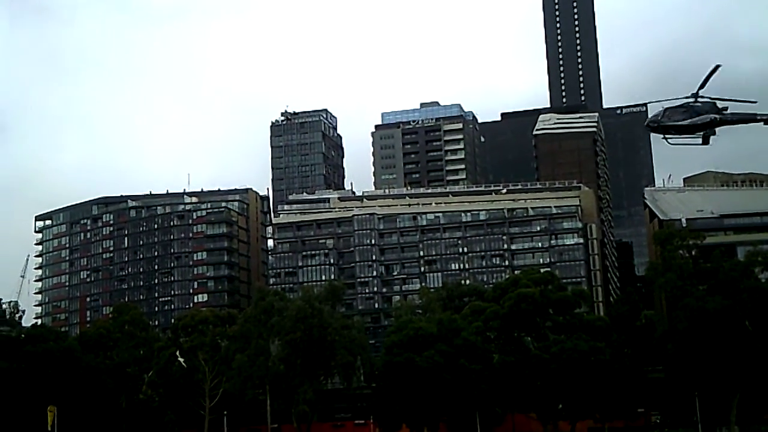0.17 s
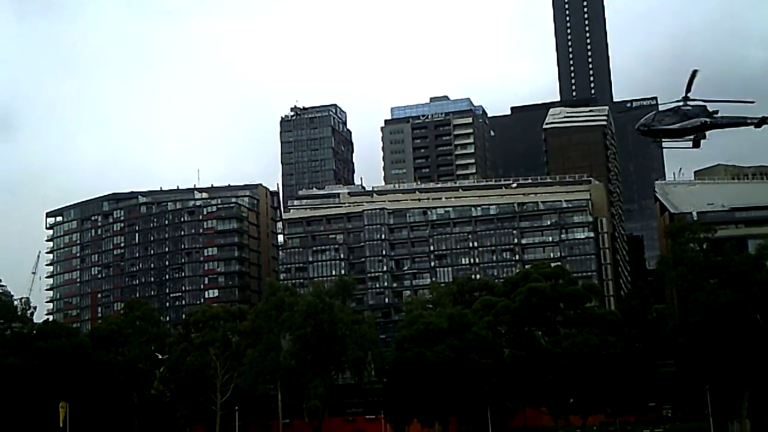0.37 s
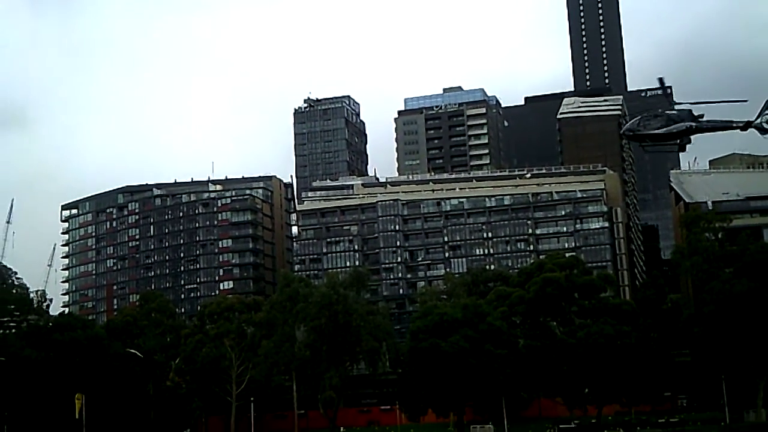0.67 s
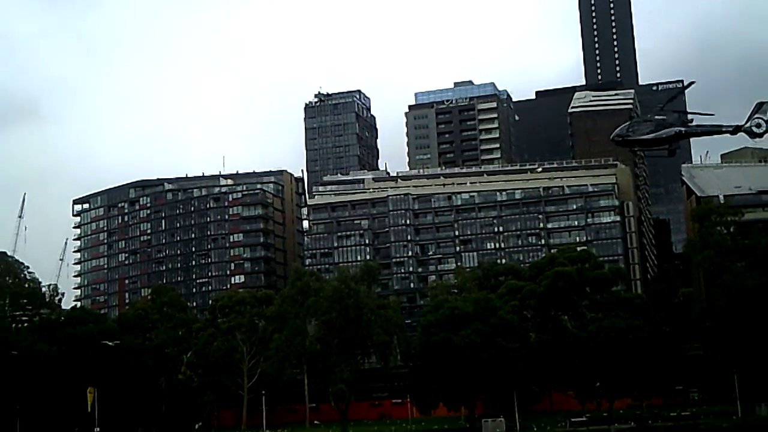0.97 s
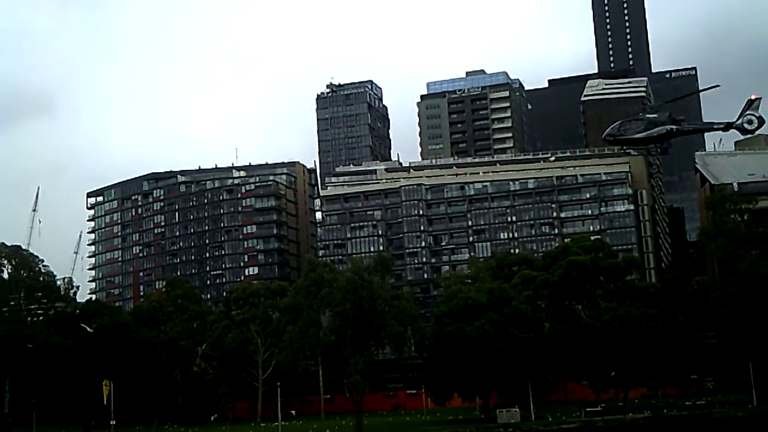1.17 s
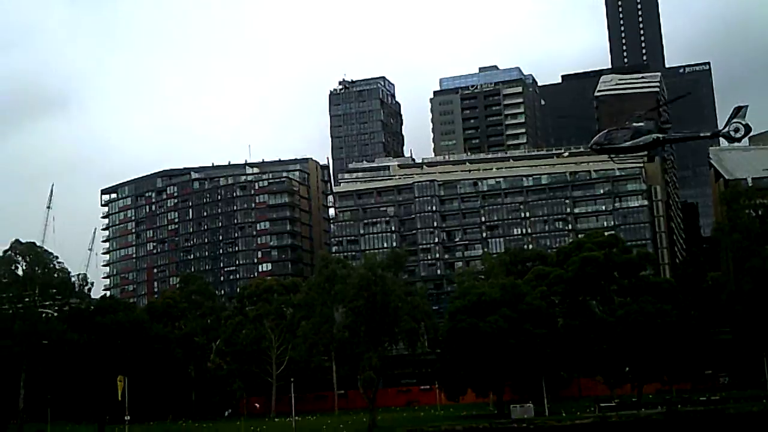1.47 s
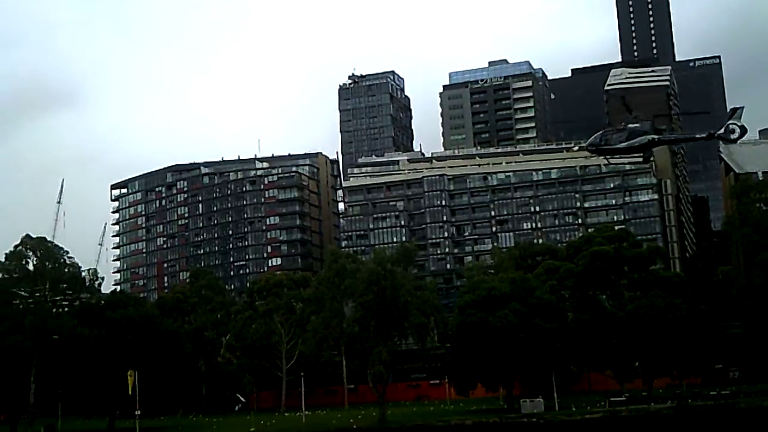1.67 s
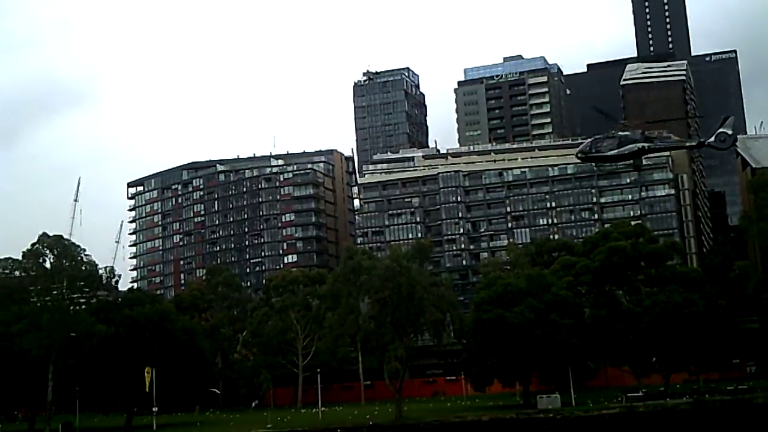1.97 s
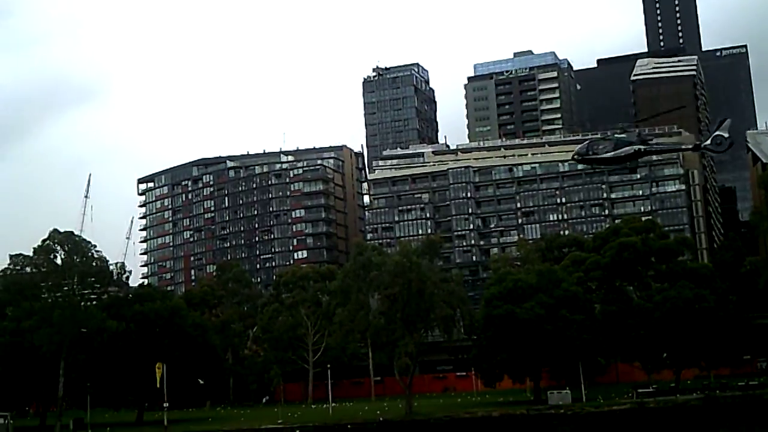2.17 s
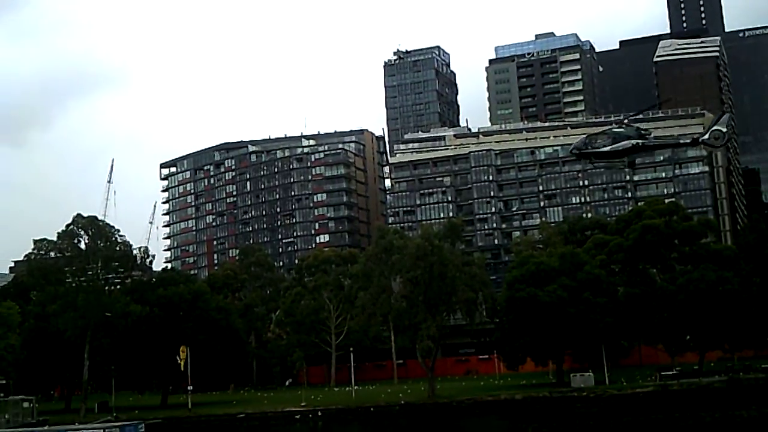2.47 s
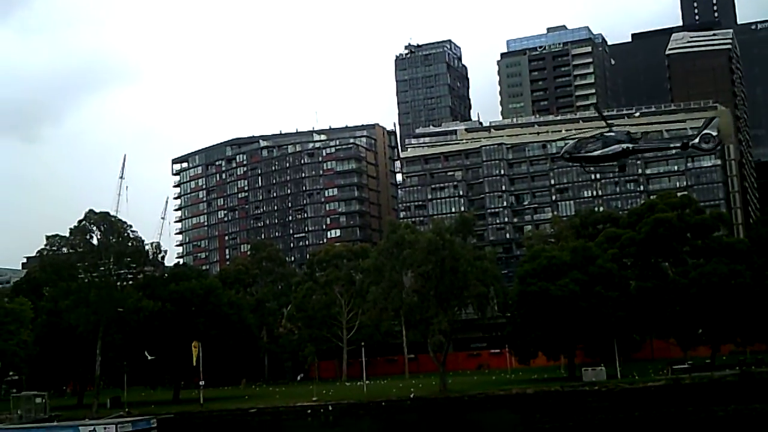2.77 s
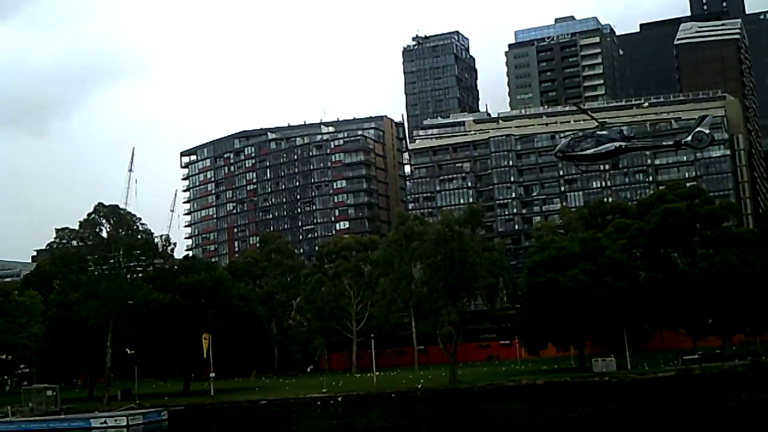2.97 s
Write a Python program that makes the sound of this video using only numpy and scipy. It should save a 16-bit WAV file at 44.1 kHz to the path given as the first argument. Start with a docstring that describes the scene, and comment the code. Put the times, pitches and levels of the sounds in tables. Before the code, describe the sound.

Helicopter rotor throbs deep and steady, sharp uneven slaps overloading the microphone, then a smoother roar

```python
"""A helicopter comes down in front of city buildings, some way off.
From the start its rotor throbs about 19 times a second (summed cosines), with roar and hiss of filtered noise over it.
At first hard, uneven blade slaps overload the microphone, which crackles; later on, softer slaps (swings and noise) follow.
Hiss flares up now and then; just before 1.4 s the recorder skips about 21 ms, so the throb jumps ahead with a click.
A few hard slaps return near the end and a faint turbine whine grows, over the blurred tones of the tail fan."""
import sys
import numpy as np
from scipy.fft import rfft, irfft, next_fast_len
from scipy.io import wavfile
from scipy.ndimage import map_coordinates

SR = 44100
rng = np.random.default_rng(int(sys.argv[2]) if len(sys.argv) > 2 else 0)


def generate_wav(sig):
    """Save sig (samples, or channels by samples) to the path in sys.argv[1] as 16-bit PCM at SR."""
    pcm = np.round(np.clip(np.atleast_2d(sig).T, -1, 1) * 32767).astype(np.int16)
    wavfile.write(sys.argv[1], SR, pcm)


N = 137592
LENGTH = N + 2048  # samples made before the end is trimmed
BLADE_HZ = 19.335  # blades passing per second

# the four lowest tones of the rotor: t/s, then the level/dB of each tone
THROB_LEVELS = [(0, -9.5, -18, -29, -31), (.5, -10.3, -21, -27, -32), (.8, -11, -22, -22.5, -38),
                (1.25, -12, -23.5, -25, -40), (1.7, -12.7, -29, -28.5, -36), (2.3, -10.7, -27.5, -26, -36),
                (2.65, -10.7, -26.5, -34, -40), (3.1, -10.7, -26.5, -31, -52)]
# the hard blade slaps: t/s, peak/dB, pitch f/Hz, decay/s, base level of the crackle/dB
STRONG_SLAPS = [(0.02, -14.5, 371, 0.01, -48), (.068, -14, 332, 0.0049, -44),
                (.121, -12, 342, 0.0047, -43.5), (0.172, -17.5, 300, 0.0082, -52),
                (0.221, -18, 290, .006, -47), (0.274, -10.5, 332, 0.0074, -43.5),
                (.327, -13.5, 387, 0.01, -49.5), (0.377, -16, 300, .006, -54.5),
                (0.427, -16, 330, 0.0091, -54), (.482, -12, 490, .007, -45.5),
                (.535, -7, 368, 0.0026, -39.5), (0.641, -10.5, 316, 0.0073, -55),
                (0.687, -8.5, 269, 0.0091, -48), (0.739, -9, 277, 0.0029, -50),
                (0.791, -13.5, 307, 0.005, -52), (.900, -14, 370, 0.005, -55), (.945, -8, 291, .007, -46),
                (0.998, -10, 430, .007, -51), (1.053, -11, 300, 0.0052, -54),
                (1.151, -15.5, 240, 0.0036, -56), (1.207, -7.5, 380, 0.0025, -45.5),
                (1.308, -11, 382, 0.007, -55), (2.577, -17.5, 393, .003, -61),
                (2.655, -16, 335, 0.0035, -57), (2.705, -15, 377, 0.0054, -57),
                (3.02, -14, 350, 0.0023, -59)]


def amp(db):
    """Turn decibels into a gain."""
    return 10 ** (np.asarray(db) / 20)


def unit(x):
    """Scale a sound to an average strength (rms) of 1."""
    return x / np.sqrt(np.mean(x ** 2) + 1e-20)


def seconds():
    """The time of each sample."""
    return np.arange(LENGTH) / SR


def along(points, hz):
    """Read a curve of (f/Hz, value) points, with pitch on a log scale."""
    f, v = np.transpose(points)
    return np.interp(np.log(hz + 1), np.log(f + 1), v)


def curves(rows):
    """One smooth run of values for each column after the time."""
    s, *columns = np.transpose(rows)
    return [np.interp(seconds(), s, column) for column in columns]


def wobble(rate):
    """A smooth random curve with this many random points a second."""
    return map_coordinates(rng.standard_normal(256), [seconds() * rate], mode="wrap")


def filtered(x, response):
    """Make each frequency of x louder or softer by the given response."""
    size = next_fast_len(LENGTH + SR // 2)
    spectrum = rfft(x, size) * response(np.fft.rfftfreq(size, 1 / SR))
    return irfft(spectrum, size)[:len(x)]


def noise(spectrum, gate=1):
    """Noise of rms 1, gated and then coloured; it falls away steeply above the last point of its spectrum."""
    def colour(hz):
        return amp(along(spectrum, hz)) / (1 + (hz / spectrum[-1][0]) ** 10)
    return unit(filtered(gate * rng.standard_normal(LENGTH), colour))


def blade_turns(delay_s=0):
    """Blades passed so far; the recorder skips about 21 ms, so the throb jumps ahead with a click."""
    first_blade_s = 0.0135
    skip_at_s, skip_s = 1.3870, .0213
    t = seconds()
    return BLADE_HZ * (t + skip_s * (t > skip_at_s) - first_blade_s - delay_s)


def throb():
    """Each blade pushes one broad trough of pressure; higher tones lag more, and all slide against each other."""
    lag = 0.8  # radians, times the square of the tone's number
    # the shifting ground echo detunes each tone a little, counted from one moment
    echo_shift_hz, echo_from_s = (0, .14, -.16, -.6), .95
    angle = 2 * np.pi * blade_turns()
    slide = 2 * np.pi * (seconds() - echo_from_s)
    out = np.zeros(LENGTH)
    for k, db in enumerate(curves(THROB_LEVELS)):
        phase = (k + 1) * angle + lag * k * k + echo_shift_hz[k] * slide
        out -= np.sqrt(2) * amp(db) * np.cos(phase)
    return out


def buzz(count=32):
    """Higher rotor tones fade in and out as echoes shift; the ground lifts a band that rises with the descent."""
    # the higher rotor tones before the lift: f/Hz, level/dB
    tone_levels = [(97, -38), (116, -37), (140, -41.5), (175, -38), (220, -36.5), (280, -35.5),
                   (380, -37.5), (500, -39), (700, -51)]
    # the band lifted by the ground reflection: t/s, centre f/Hz, lift/dB
    ground_lift = [(0, 128, 4.5), (1.1, 129, 9.5), (1.6, 153.4, 6), (2.1, 164, 8.5), (3.1, 179, 9.5)]
    drift_per_s, ground_octaves = 3.958, 0.14  # speed of fading, width of the lifted band
    angle, out = 2 * np.pi * blade_turns(), np.zeros(LENGTH)
    lifted_hz, ground_db = curves(ground_lift)
    for k in range(len(THROB_LEVELS[0]), count):
        hz = k * BLADE_HZ
        a, b = wobble(drift_per_s), wobble(drift_per_s)
        octaves_away = np.log2(hz / lifted_hz)
        lift_db = ground_db * np.exp(-.5 * (octaves_away / ground_octaves) ** 2)
        tone = unit(a * np.cos(k * angle) + b * np.sin(k * angle))
        out += amp(along(tone_levels, hz) + lift_db) * tone
    return out


def slap_times(scatter_db=2):
    """Rows (t/s, peak/dB, f/Hz, decay/s): the hard slaps, and a soft uneven one for each remaining blade."""
    # the soft slaps before random scatter: t/s, peak/dB
    soft_levels = [(.5, -15.5), (.85, -17.5), (1.2, -15.5), (1.5, -24), (2.2, -25), (2.6, -20.5),
                   (3.1, -28.5)]
    delay_s, jitter_s, decay_s = 0.0049, .003, 0.0093
    middle_hz, spread_octaves = 351, .3
    hard = np.array(STRONG_SLAPS)[:, :-1]
    passes = seconds()[1:][np.diff(np.floor(blade_turns(delay_s))) > 0]
    late, loud, sharp = rng.standard_normal((len(passes), 3)).T
    s = passes + jitter_s * late
    db = np.interp(s, *np.transpose(soft_levels)) + scatter_db * loud
    hz = middle_hz * 2 ** (spread_octaves * sharp)
    soft = np.column_stack([s, db, hz, np.full(len(s), decay_s)])
    # a soft slap is left out where a hard one is close by
    free = np.abs(s[:, None] - hard[:, 0]).min(axis=1) > .5 / BLADE_HZ
    return np.vstack([hard, soft[free]])


def slap():
    """Each blade cuts the wake of the one before: a few swings around a sharp trough, in a short dull burst."""
    # colour of the burst of noise: f/Hz, relative level/dB
    burst_colour = [(100, -20), (200, -0.5), (280, -0.5), (450, 2), (600, -4.5), (1100, -9.5),
                    (1600, -15.5), (2100, -23), (2800, -22.5), (4000, -45)]
    rise_s, burst_db = .003, -8  # burst level is relative to the swings
    swings, power, t = np.zeros(LENGTH), np.zeros(LENGTH), seconds()
    for s, db, hz, decay in slap_times():
        near = np.abs(t - s) < 2 / BLADE_HZ
        age = t[near] - s
        fade = np.where(age < 0, (age / rise_s) ** 2, age / decay)
        envelope = amp(db) * np.exp(-fade)
        swings[near] -= envelope * np.cos(2 * np.pi * hz * age)
        power[near] += envelope ** 2
    return swings + amp(burst_db) * np.sqrt(power) * noise(burst_colour)


def crackle(scatter_db=-0.5):
    """Each hard slap overloads the microphone, which crackles in a few thin dry ticks."""
    # the ticks of one crackle: t/s from the tip of the slap, level/dB above its base
    tick_pattern = [(-.004, 12), (0, 19), (.0012, 14)]
    # colour of the ticks: f/Hz, gain/dB
    tick_colour = [(1000, -20), (2500, 3), (5000, 0), (8000, -6), (12000, -13), (16000, -18)]
    jitter_s = .0007
    clicks = np.zeros(LENGTH)
    for s, *_, db in STRONG_SLAPS:
        for offset_s, tick_db in tick_pattern:
            late, loud = rng.standard_normal(2)
            place = round((s + offset_s + jitter_s * late) * SR)
            clicks[place] += amp(db + tick_db + scatter_db * loud)
    return filtered(clicks, lambda hz: amp(along(tick_colour, hz)))


def swish(depth_db):
    """A gain that swells and sinks with each passing blade and flutters in the turbulent air."""
    delay_s = 0.014
    flutter = .4 * wobble(14)  # turned into gain by amp, so in dB
    return amp(depth_db * np.cos(2 * np.pi * blade_turns(delay_s)) + flutter)


def roar():
    """Downwash and turbine exhaust: bands of noise chopped by the blades, over a steady rumble."""
    # the low roar: t/s, level/dB
    low_levels = [(0, -29), (.6, -24), (1.3, -25), (1.7, -24), (2.1, -23), (2.6, -22), (3.1, -24.5)]
    # upper bands, before the trims below: t/s, midrange level/dB, treble level/dB, top hiss level/dB
    upper_levels = [(0.03, -30.0, -39.5, -70.5), (0.2, -28.5, -38.5, -70.5), (0.36, -27.0, -39.0, -70.0),
                    (0.55, -28.0, -36.5, -68.5), (0.75, -27.0, -37.5, -68.5), (0.88, -27.5, -37.0, -69.5),
                    (1.0, -27.5, -35.0, -67.0), (1.22, -29.0, -38.5, -70.5), (1.37, -27.5, -34.5, -69.5),
                    (1.5, -29.0, -39.5, -72.5), (1.66, -31.0, -39.5, -71.5), (1.78, -29.5, -38.0, -69.5),
                    (1.98, -29.0, -39.0, -70.5), (2.18, -28.0, -36.5, -68.5), (2.35, -28.5, -39.0, -69.0),
                    (2.6, -27.0, -36.5, -67.5), (2.82, -27.0, -36.0, -68.0), (3.08, -28.5, -37.0, -67.5)]
    # colours of low roar, downwash, exhaust, turbine hiss and rumble, each: f/Hz, relative level/dB
    low_colour = [(90, -18.5), (140, 2), (180, 3.5), (235, -8), (320, 5), (400, -2.5), (490, 1.5),
                  (580, -10), (800, -10), (1000, -24.5)]
    wash_colour = [(400, -44.5), (600, 0), (700, 1), (850, -5.5), (950, -1.5), (1200, -3), (1420, -7.5),
                   (1650, -20), (2000, -38.5)]
    exhaust_colour = [(1200, -22.5), (1680, -11), (1850, -1.5), (2050, -2), (2250, -6.5), (2780, -7),
                      (3150, -20), (3700, -20.5), (4100, -25.5), (4600, -36.5)]
    hiss_colour = [(3000, -14), (3800, -3), (4100, -4), (4500, -2), (4800, -5), (5150, -11), (5800, -5),
                   (6250, -7), (6700, -4), (7600, -13), (8300, -22), (9000, -48)]
    rumble_colour = [(15, -11), (35, 9), (70, 27.5), (130, 28.5), (200, -8.5)]
    wash_trim_db, exhaust_trim_db, hiss_trim_db = 0.8, 0, 5
    rumble_db = -36.5
    mid_db, high_db, hiss_db = curves(upper_levels)
    low = amp(curves(low_levels)[0]) * noise(low_colour, swish(depth_db=1.4))
    mid = amp(mid_db + wash_trim_db) * noise(wash_colour, swish(depth_db=1.5))
    high = amp(high_db + exhaust_trim_db) * noise(exhaust_colour, swish(depth_db=1.66))
    # a negative depth: the hiss sinks where the other bands swell
    hiss = amp(hiss_db + hiss_trim_db) * noise(hiss_colour, swish(depth_db=-0.5))
    return low + mid + high + hiss + amp(rumble_db) * noise(rumble_colour)


def flares():
    """The turbine's hiss flares up roughly now and then and dies away: grainy noise with quick swells."""
    # the flares: t/s of the peak, decay/s, level/dB
    flare_list = [(.945, .09, -43.5), (1.29, .04, -51), (1.36, .045, -46), (1.76, .06, -54),
                  (2.05, .06, -55), (2.16, .12, -52), (2.68, .15, -51)]
    # colour of the hiss: f/Hz, relative level/dB
    flare_colour = [(1500, -15), (2600, 0), (3800, -3), (4700, -15), (7000, -25), (9000, -60)]
    rise_s, grain_db = .014, 2
    t, level = seconds(), np.zeros(LENGTH)
    for s, decay, db in flare_list:
        fade = np.maximum((s - t) / rise_s, (t - s) / decay)
        level += amp(db) * np.exp(-fade)
    return level * noise(flare_colour, amp(grain_db * wobble(160)))


def whine():
    """A blurred turbine whine, a narrow band of noise that grows as the tail turns toward the listener."""
    # the whine: t/s, level/dB
    whine_levels = [(0, -75), (1.5, -76), (2.1, -67), (3.1, -67)]
    # colour of the whine: f/Hz, relative level/dB
    whine_colour = [(4000, -37.5), (4400, 4.5), (4650, 1.5), (4900, -17.5), (5400, -30)]
    return amp(curves(whine_levels)[0]) * noise(whine_colour)


def tail_rotor():
    """Faint tones of the shrouded tail fan, blurred because their strength and phase wander."""
    # the tones: f/Hz, width of the blur/Hz, level/dB
    fan_tones = [(633.4, 14, -40.5), (1824, 19, -62.5)]
    angle, out = 2 * np.pi * seconds(), np.zeros(LENGTH)
    for hz, width, db in fan_tones:
        tone = wobble(width) * np.cos(hz * angle) + wobble(width) * np.sin(hz * angle)
        out += amp(db) * unit(tone)
    return out


def scene():
    """The whole helicopter, in mono."""
    rotor = throb() + buzz() + slap() + crackle()
    air_and_turbine = roar() + flares() + whine()
    return (rotor + air_and_turbine + tail_rotor())[None]


def record(dry):
    """Flatten the loudest peaks, then cut the sound off steeply above the top frequency."""
    ceiling, knee = .73, 12  # a higher knee bends more sharply at the ceiling
    top_hz, top_slope = 16000, 80
    x = dry[0] / (1 + np.abs(dry[0] / ceiling) ** knee) ** (1 / knee)
    return filtered(x, lambda hz: 1 / (1 + (hz / top_hz) ** top_slope))[None, :N]


dry = scene()
out = record(dry)
generate_wav(out)
```